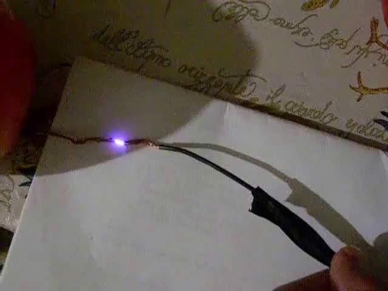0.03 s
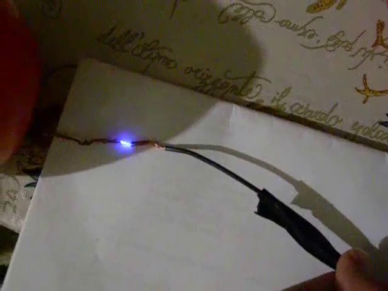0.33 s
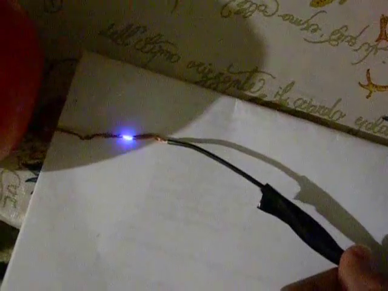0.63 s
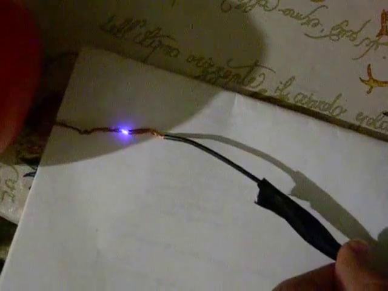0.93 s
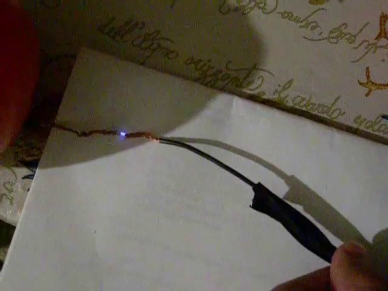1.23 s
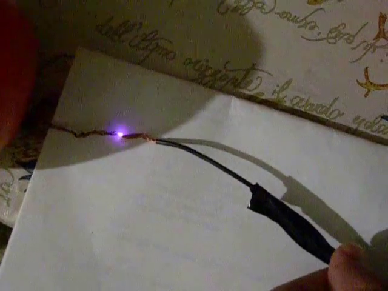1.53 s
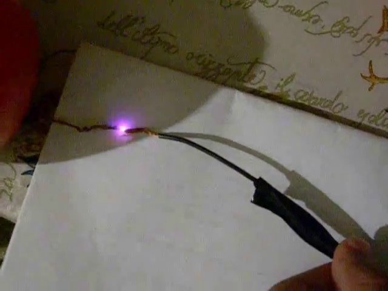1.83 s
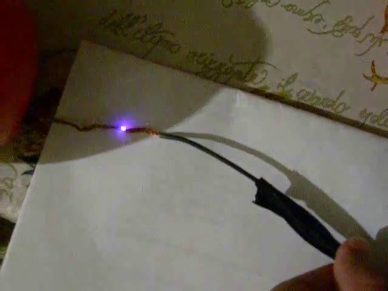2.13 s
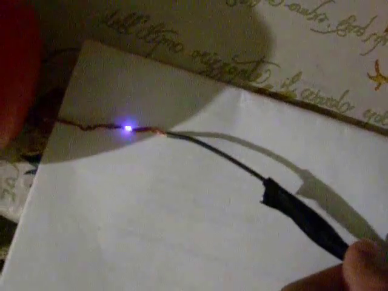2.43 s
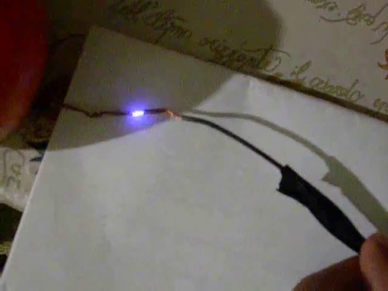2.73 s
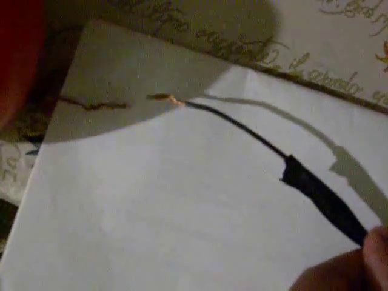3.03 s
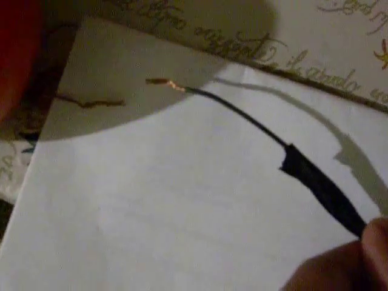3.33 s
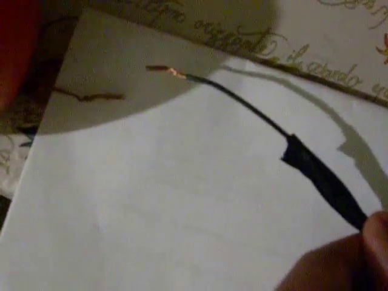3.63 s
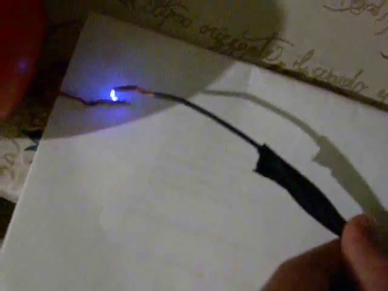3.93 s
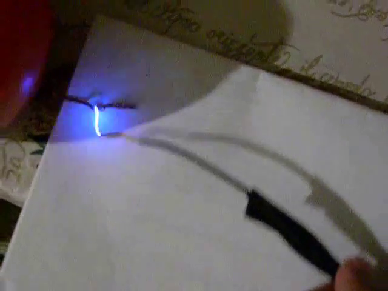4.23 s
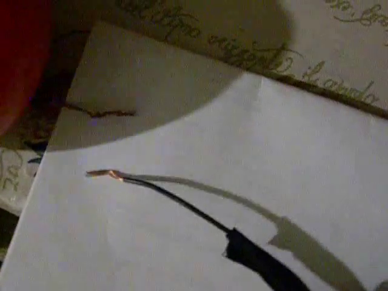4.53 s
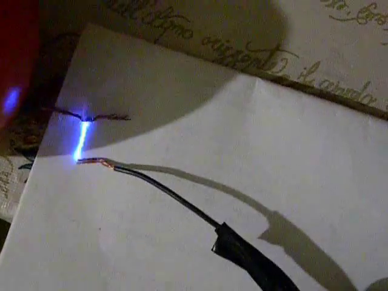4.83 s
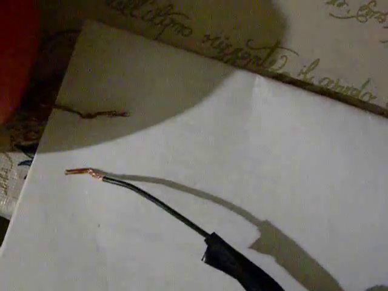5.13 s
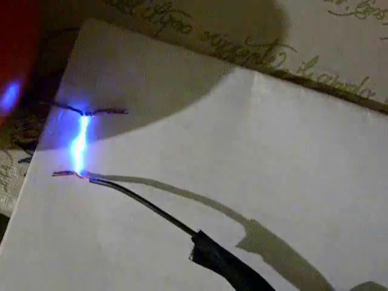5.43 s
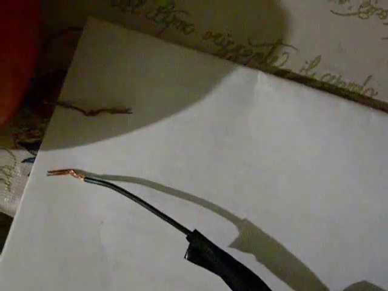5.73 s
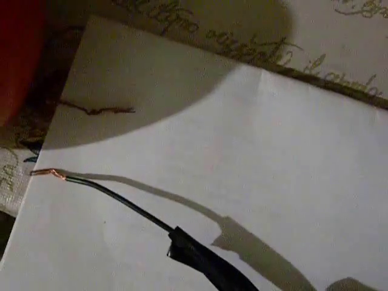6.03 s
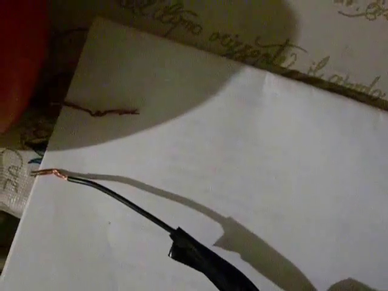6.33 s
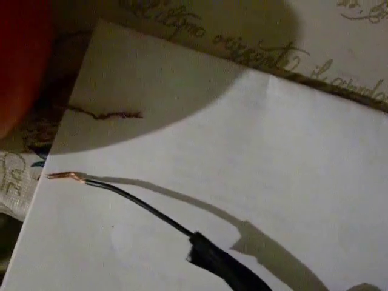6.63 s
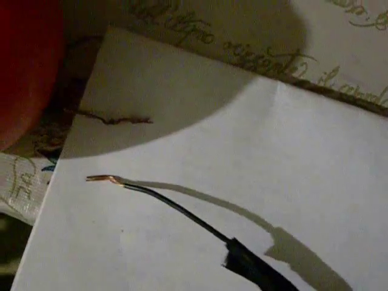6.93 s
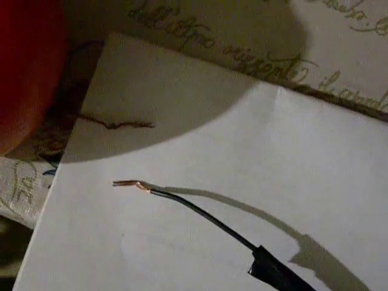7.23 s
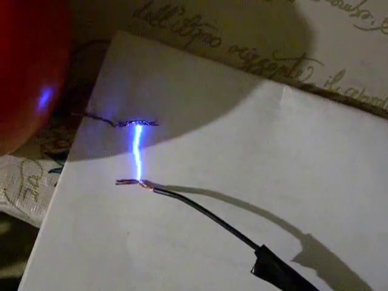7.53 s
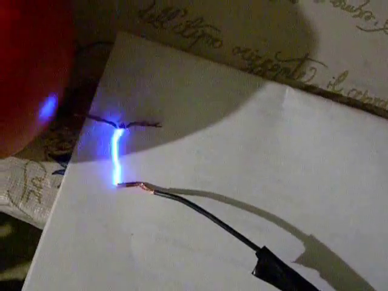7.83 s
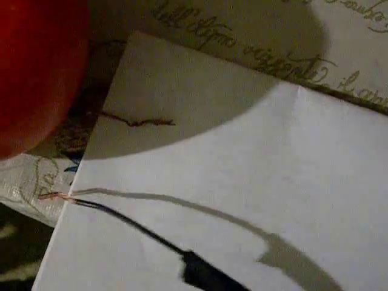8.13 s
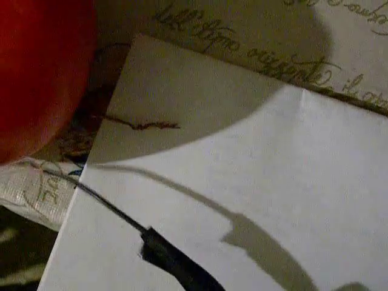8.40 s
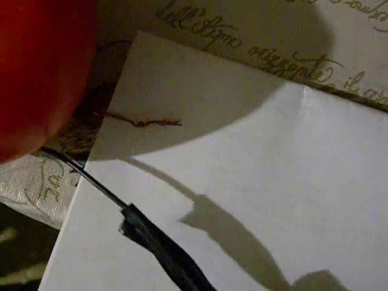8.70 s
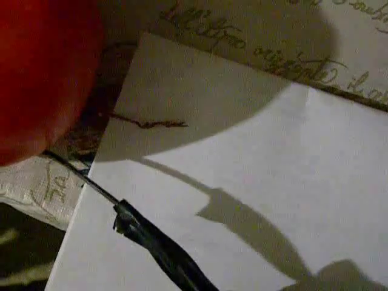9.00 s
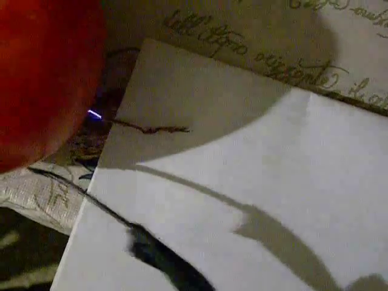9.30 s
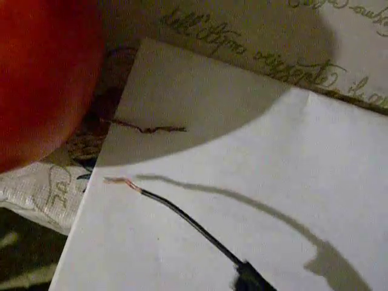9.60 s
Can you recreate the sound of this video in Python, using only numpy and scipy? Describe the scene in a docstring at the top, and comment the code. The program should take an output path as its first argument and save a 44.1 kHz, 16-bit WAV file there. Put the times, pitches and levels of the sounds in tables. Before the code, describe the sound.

In a quiet room, a high-voltage coil sparks across a small gap to a hand-held wire. Two small snaps lead into quick, even ticking, which grows louder as the gap widens. It then breaks up into hard, irregular snaps, singly and in short runs, many with a low thump on the close microphone. Between them, leaking charge fizzes softly and the coil's switch buzzes faintly.

```python
"""Two small snaps, then a quick, even ticking: a high-voltage coil, switched about 23 times a second,
sparks across a short gap to a hand-held wire over a table in a quiet room. As the wire is drawn away,
it fizzes with leaking charge and fires only now and then, with hard snaps. Each snap is a burst of
hot air, and its electric surge also thumps the microphone input. The switch buzzes underneath."""
import sys
import numpy as np
from scipy import signal
from scipy.fft import rfft, irfft, next_fast_len
from scipy.io import wavfile

SR = 44100
rng = np.random.default_rng(int(sys.argv[2]) if len(sys.argv) > 2 else 0)


def wav_record(signal):
    """Record a signal, one row per channel, as 16-bit PCM in the file named by sys.argv[1]."""
    frames = np.transpose(np.atleast_2d(signal))
    bounded = np.clip(frames, -1, 1)
    # unit amplitude maps onto the largest positive 16-bit level
    quanta = np.round(bounded * 32767).astype(np.int16)
    wavfile.write(sys.argv[1], SR, quanta)


N = 434826
TIME = np.arange(N) / SR

# Table levels are relative: each source sets its overall loudness later. full sparks with hard snaps, the first
# few while the gap is still short: t/s, crack level/dB, thump level/dB, thump f/Hz
SNAPS = [(0.0717, -16.5, -18.5, 139), (0.115, -18, -26, 130), (3.3177, -8.5, -51, 594),
         (3.362, -4.5, -25, 344), (3.4057, -11, -35, 610), (3.4938, -8, -45, 130), (3.9316, -8, -38, 600),
         (3.9762, -10, -38, 480), (4.0634, -11.5, -27, 120), (4.4146, -15.5, -28, 130),
         (4.4587, -10.5, -22, 150), (4.5027, -14, -17.5, 160), (4.7649, -0.5, -0.5, 182),
         (4.853, -10.5, -8.5, 190), (4.9404, -4.5, -6, 180), (4.9842, -12.5, -14, 170),
         (5.072, -6, -5, 171), (5.1154, -9.5, -7, 204), (5.1597, -11, -8.5, 164), (5.2473, -10.5, -9, 230),
         (5.2914, -12.5, -8, 160), (5.3354, -9.5, -8.5, 193), (5.4228, -7, -12, 168), (5.6419, -7, -6, 195),
         (5.6864, -4.5, -6, 190), (5.8171, -12, -2, 275), (5.8613, -16, -7, 232), (5.9052, -2.5, -4, 241),
         (6.1694, -3, 2.5, 330), (6.5211, -4.5, -5.5, 188), (6.8294, 3.5, 10.5, 302),
         (7.0496, -10.5, 1.5, 310), (7.313, -1, 1, 158), (7.3568, -12, -6.5, 200), (7.5324, -6.5, 7.5, 380),
         (7.62, -17, 3.5, 318), (7.7957, -11.5, 5.5, 394), (7.8393, -15.5, -19.5, 150),
         (8.1034, -6.5, -6, 144), (8.5858, -9, -22.5, 129), (8.806, -3.5, -1.5, 220), (8.8934, 0, -1, 210),
         (9.069, -5, -24.5, 616), (9.113, -11, -11, 226), (9.201, -6, -8, 182), (9.2889, -7.5, -8, 180),
         (9.3764, -5.5, -5, 190), (9.4209, -11, -14.5, 180), (9.4646, -11, -20, 140),
         (9.5084, -9.5, -11.5, 170), (9.5522, -13, -23, 137), (9.5964, -8.5, -12, 180)]
# sparks over a short gap, louder as it widens; one curve for each approach of the wire: t/s, level/dB
SHORT_GAP_ARCS = [
    [(0, -15.5), (.42, -18.5), (.75, -17), (1.25, -15), (1.5, -19.5), (1.85, -17), (2.45, -22.5),
     (2.8, -15.5), (3.3, -7.5)],
    [(4.08, -16.5), (4.24, -9), (4.35, -8)],
]
# the strongest short-gap sparks as the switch closes: t/s, level/dB
CLOSING_SPARKS = [(0.058, -20), (0.3652, -19), (0.41, -21.5), (0.5422, -23), (0.585, -19.5), (0.7176, -20),
                  (1.1993, -15.5), (1.332, -19), (1.6818, -16.5), (1.858, -18.5), (1.902, -21),
                  (2.164, -21), (2.297, -20), (2.3387, -19), (2.4708, -19), (2.69, -15.5), (2.866, -17.5),
                  (2.997, -18), (3.1291, -14)]
# how hard the coil hisses and buzzes, and how much the apparatus rings: t/s, level/dB, ring level/dB
FIZZ_AND_BUZZ = [(0, -13.5, 3.5), (1.2, -10.5, .5), (1.7, -8.5, 5), (2.6, -7, 4.5), (2.9, -8.5, -0.5),
                 (3.56, -15, -2.5), (3.95, 2, 0.5), (4.12, -10, 0), (4.45, -12.5, -5), (4.76, -7.5, -3),
                 (5.3, 0.5, -7), (7.9, -1.5, -12), (8.65, -1.5, 3.5), (9.1, -3, 1.5), (9.8, 0.5, -2.5)]
# tone colour of the fizz: f/Hz, level/dB
FIZZ_SPECTRUM = [(30, -2.5), (100, -3), (180, -3.5), (290, -0.5), (550, -0.5), (900, -4), (1400, -3.5),
                 (1750, -7.5), (2150, -4), (2800, -4), (3300, -2.5), (4200, -11.5)]
# pitches at which the apparatus rings: f/Hz, width/Hz, level/dB
APPARATUS_RINGS = [(280, 12, 5.5), (420, 13, 2.5), (520, 18, 0.5), (615, 12, -3.5), (857, 21, 1),
                   (1662, 51, 0.5), (1767, 25, -0.5), (1805, 26, 2.5), (1834, 50, -1.5), (2784, 24, 0.5)]
# pitches at which the switch rings: f/Hz, width/Hz, level/dB
SWITCH_RINGS = [(1750, 230, -4), (2850, 300, -1.5), (3250, 290, -10)]
# how far the switch strays from a steady beat (negative is early): t/s, delay/s
BEAT_DRIFT = [(0, .0002), (1.35, -.0005), (2.95, -.0049), (3.9, -.0054), (5.8, -.01), (7.2, -.0089),
              (9.8, -.0099)]
# echoes from nearby surfaces: delay/s, level/dB
ECHOES = [(.00073, -19), (.00125, -21.5), (.0021, -30.5), (.0042, -32.5), (0.0158, -26)]
# tone colour of the steady hiss: f/Hz, level/dB
HISS_SPECTRUM = [(30, -1.5), (100, -0.5), (300, -2.5), (700, -4), (2000, -8.5), (4500, -2)]

BEAT_S, CLOSED_S = .04394, 0.014   # the switch opens once a beat, after being closed this long
ARC_BRIGHT_HZ, TICK_BRIGHT_HZ = 6000, 3030   # the treble fades above these pitches
BURST_SAMPLES = 1024   # length of one short sound


def snaps(bright_hz=2425, db_per_octave=19, restrike_range_s=(.00005, .00069)):
    """Charge jumps the gap with a hard crack, then strikes again along the still hot path."""
    pulses = np.zeros(N)
    for s, db, _, _ in SNAPS:
        top_hz = bright_hz * 2 ** (-db / db_per_octave)   # stronger snaps are duller
        pulse = from_db(db) * spark(top_hz, branch_db=-14.5, branch_s=0.002)
        add(pulses, s, pulse, restrike_s=rng.uniform(*restrike_range_s))
    return crack(pulses, low_hz=480, ring_hz=1650, ring_width_hz=3700, ring_db=-15.5, gain_db=16)


def thumps(top_ratio=4.3, lag_hz=1200, gain_db=24, restrike_cycles=0.056):
    """A snap's surge kicks the microphone input, which swings back within a few milliseconds."""
    out = np.zeros(N)
    for s, _, db, hz in SNAPS:
        band = signal.butter(1, [hz / 2, hz * 2], "band", fs=SR)
        swing = signal.lfilter(*band, signal.unit_impulse(BURST_SAMPLES))
        rounded = cut(swing, top_ratio * hz, "low", order=2)
        add(out, s, -from_db(db + gain_db) * rounded, restrike_s=restrike_cycles / hz)
    # the lows lag behind the highs: a spike, then a slower swing the other way
    return 2 * cut(out, lag_hz, "low", order=1) - out


def ticks(openings, background_db, scatter_db=0.65):
    """Small sparks tick as the switch opens, and sometimes as it closes."""
    pulses = np.zeros(N)
    for s, db, bright_hz in opening_sparks(openings, background_db) + closing_sparks(openings):
        gain = from_db(db + scatter_db * rng.standard_normal())
        add(pulses, s, gain * spark(bright_hz, branch_db=-7, branch_s=0.0007))
    return crack(pulses, low_hz=610, ring_hz=3380, ring_width_hz=800, ring_db=-1, gain_db=12)


def opening_sparks(openings, background_db, faint_db=-10.5, follow=0.84):
    """Openings with no snap spark if the wire is close, else tick faintly: t/s, level/dB, f/Hz."""
    times = clear_of(openings, SNAPS)
    db = faint_db + follow * np.interp(times, TIME, background_db)
    bright_hz = np.full(len(times), float(TICK_BRIGHT_HZ))
    for arc in SHORT_GAP_ARCS:
        close = (times >= arc[0][0]) & (times <= arc[-1][0])
        db[close] = curve(arc, times[close])[0]
        bright_hz[close] = ARC_BRIGHT_HZ
    return list(zip(times, db, bright_hz))


def closing_sparks(openings, short_gap_until_s=2.9, weak_chance=0.2, weak_db=-24):
    """While the gap is short, some closings of the switch spark too: t/s, level/dB, f/Hz."""
    closings = clear_of(openings[openings < short_gap_until_s] - CLOSED_S, CLOSING_SPARKS)
    dice = rng.random(len(openings))
    weak = [(s, weak_db) for s, roll in zip(closings, dice) if roll < weak_chance]
    return [(s, db, ARC_BRIGHT_HZ) for s, db in CLOSING_SPARKS + weak]


def spark(bright_hz, branch_db, branch_s):
    """One spark gives the air a sharp push, and its side branches add an uneven spray."""
    spray = rng.standard_normal(BURST_SAMPLES) * np.exp(-np.arange(BURST_SAMPLES) / SR / branch_s)
    pulse = signal.unit_impulse(BURST_SAMPLES) + from_db(branch_db) * spray / np.linalg.norm(spray)
    return cut(pulse, bright_hz, "low", order=3)


def crack(pulses, low_hz, ring_hz, ring_width_hz, ring_db, gain_db):
    """The bursting path of a spark sounds thin: little bass and one broad ring."""
    ring = from_db(ring_db) * resonate(pulses, ring_hz, ring_width_hz)
    return from_db(gain_db) * (cut(pulses, low_hz, "high", order=1) + ring)


def fizz(background_db, level_db=-37.5, follow=0.8, flicker_db=2.5, flicker_hz=250):
    """Charge leaking off the wire fizzes in small uneven bursts, and the apparatus rings along."""
    flicker = rms_one(cut(rng.standard_normal(N), flicker_hz, "low", order=2))
    _, ring_db = curve(FIZZ_AND_BUZZ, TIME)
    hiss = coloured_noise(FIZZ_SPECTRUM) + from_db(ring_db) * ringing_noise(APPARATUS_RINGS)
    return from_db(level_db + follow * background_db + flicker_db * flicker) * rms_one(hiss)


def switch_buzz(openings, background_db, level_db=-30, rise_s=0.00058, fall_s=0.0089):
    """The switch chatters for some milliseconds each time it closes."""
    age = np.arange(BURST_SAMPLES) / SR
    burst = (1 - np.exp(-age / rise_s)) * np.exp(-age / fall_s)
    loudness = signal.oaconvolve(clicks(openings - CLOSED_S, 0), burst / burst.max())[:N]
    return from_db(level_db + background_db) * loudness * rms_one(ringing_noise(SWITCH_RINGS))


def switch_ping(openings, background_db, level_db=-21, hz=2550, width_hz=800, fall_s=0.00032):
    """The contact gives a soft ping as it springs open."""
    burst = np.exp(-np.arange(BURST_SAMPLES) / SR / fall_s)
    kicks = clicks(openings, level_db + np.interp(openings, TIME, background_db))
    noise_bursts = signal.oaconvolve(kicks, burst)[:N] * rng.standard_normal(N)
    boost = np.sqrt(SR / np.pi / width_hz)   # gives back the power the narrow ring removes
    return boost * resonate(noise_bursts, hz, width_hz)


def switch_openings(first_s=.02748):
    """The times at which the switch opens, on a beat that drifts slightly ahead."""
    steady = np.arange(first_s, N / SR, BEAT_S)
    return steady + curve(BEAT_DRIFT, steady)[0]


def background_level(deepest_db=30, recovery_db_per_s=38.5, base_share=0.37, doubling_db=15.5):
    """Fizz, buzz and faint ticks sink after each snap, more for a hard thump, and swell back (dB)."""
    dip_db = np.zeros(N)
    for s, _, thump_db, _ in SNAPS:
        at = int(s * SR)
        share = min(base_share * 2 ** (thump_db / doubling_db), 1)   # of the way left to the bottom
        depth_db = dip_db[at] + share * (deepest_db - dip_db[at])
        dip_db[at:] = np.maximum(depth_db - recovery_db_per_s * TIME[:N - at], 0)
    return curve(FIZZ_AND_BUZZ, TIME)[0] - dip_db


def room(x, tail_db, tail_s=0.17, scatter_db=-14, scatter_s=0.0081):
    """Sound bounces off the table, a wall and things nearby, and leaves a faint tail."""
    age = np.arange(SR // 2) / SR
    response = signal.unit_impulse(len(age))
    for delay_s, db in ECHOES:
        response[int(delay_s * SR)] += from_db(db)
    for db, fade_s in ((scatter_db, scatter_s), (tail_db, tail_s)):
        fade = np.exp(-np.log(1000) * age / fade_s)   # 60 dB down after fade_s
        wash = rng.standard_normal(len(age)) * fade
        response += from_db(db) * wash / np.linalg.norm(wash)
    return signal.oaconvolve(x, response)[:N]


def steady_hiss(level_db=-56):
    """The room and the electronics give a faint, steady hiss."""
    return from_db(level_db) * rms_one(coloured_noise(HISS_SPECTRUM))


def add(out, s, sound, restrike_s=None, restrike_db=-9):
    """Mix in a short sound at time s; a restrike, a weaker copy just after, makes it hollow."""
    at = int(round(s * SR))
    if restrike_s is not None:
        index = np.arange(len(sound))
        sound = sound + from_db(restrike_db) * np.interp(index - restrike_s * SR, index, sound, left=0)
    part = out[at:at + len(sound)]
    part += sound[:len(part)]


def clicks(times, levels_db):
    """A one-sample click at each time."""
    out = np.zeros(N)
    samples = np.clip(np.round(times * SR).astype(int), 0, N - 1)
    np.add.at(out, samples, from_db(levels_db))
    return out


def clear_of(times, rows):
    """Keep the times more than half a beat from every listed event."""
    distance_s = np.abs(times[:, None] - np.array(rows)[:, 0])
    return times[distance_s.min(axis=1) > BEAT_S / 2]


def coloured_noise(spectrum):
    """Noise shaped by a table of f/Hz, level/dB."""
    hz, db = np.transpose(spectrum)
    size = next_fast_len(N)
    bin_hz = np.maximum(np.arange(size // 2 + 1) * SR / size, 1)
    gains = from_db(np.interp(np.log(bin_hz), np.log(hz), db))
    return irfft(rfft(rng.standard_normal(size)) * gains, size)[:N]


def ringing_noise(rings):
    """Noise that rings at a few pitches."""
    return sum(from_db(db) * resonate(rng.standard_normal(N), hz, width) for hz, width, db in rings)


def resonate(x, hz, width_hz):
    """Let a sound ring at one pitch; a smaller width rings longer."""
    r = np.exp(-np.pi * width_hz / SR)
    feedback = [1, -2 * r * np.cos(2 * np.pi * hz / SR), r * r]
    return signal.lfilter(np.array([1, 0, -1]) * (1 - r * r) / 2, feedback, x + 1e-18)


def cut(x, hz, kind, order):
    """Keep the "low" or "high" side of hz; a higher order cuts more sharply."""
    sections = signal.butter(order, min(hz, .45 * SR), kind, fs=SR, output="sos")
    return signal.sosfilt(sections, x + 1e-18)


def curve(rows, at):
    """Read each column of a time table at the given times."""
    s, *columns = np.transpose(rows)
    return [np.interp(at, s, column) for column in columns]


def rms_one(x):
    """Scale a sound to an average power of 1."""
    return x / np.sqrt(np.mean(x ** 2) + 1e-20)


def from_db(db):
    """Turn decibels into a multiplier."""
    return 10 ** (np.asarray(db) / 20)


def scene():
    """Sparks in the room, their thumps, the fizz and the switch over a faint hiss, in mono."""
    openings, background_db = switch_openings(), background_level()
    switch = switch_buzz(openings, background_db) + switch_ping(openings, background_db)
    leak = fizz(background_db)
    hiss = steady_hiss()
    sparks = room(snaps(), tail_db=-17) + room(ticks(openings, background_db), tail_db=-18.5)
    return (sparks + thumps() + leak + switch + hiss)[None]


def record(dry, band_hz=4100, offset=-.0238, cutoff_hz=5109, splash_hz=10000, top_hz=16000):
    """The recorder loses the high treble; the hardest snaps overload it and splash above its range."""
    dull = signal.sosfiltfilt(signal.butter(6, band_hz, fs=SR, output="sos"), dry)
    overloaded = np.clip(dull + offset, -.98, .98)
    smoothed = signal.sosfiltfilt(signal.cheby2(14, 28, cutoff_hz, fs=SR, output="sos"), overloaded)
    splashed = cut(np.clip(smoothed, -1, 1), splash_hz, "low", order=3)   # the tips clip again
    return signal.sosfiltfilt(signal.cheby2(12, 35, top_hz, fs=SR, output="sos"), splashed)


dry = scene()
out = record(dry)
wav_record(out)
```